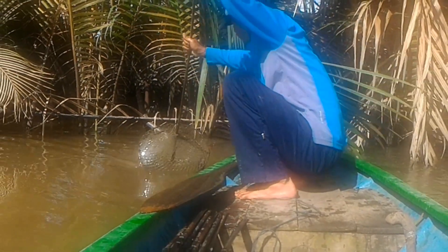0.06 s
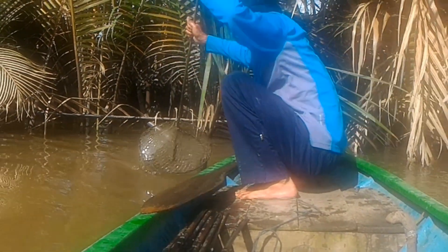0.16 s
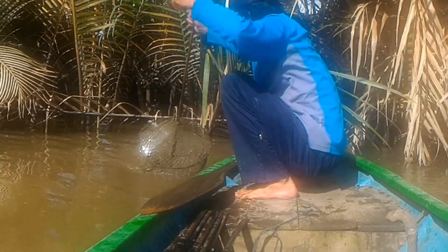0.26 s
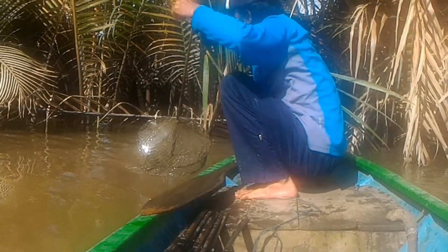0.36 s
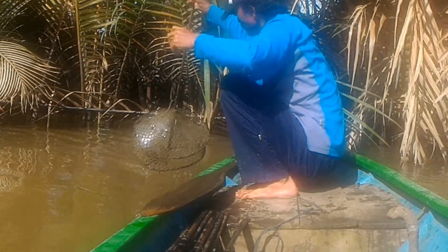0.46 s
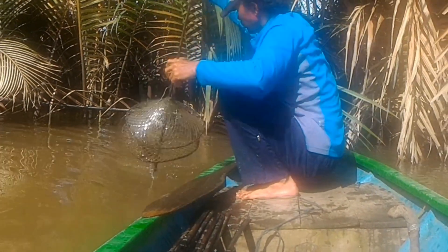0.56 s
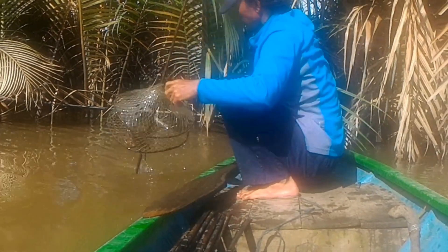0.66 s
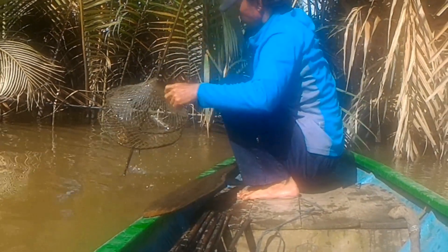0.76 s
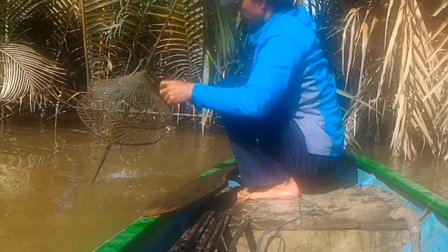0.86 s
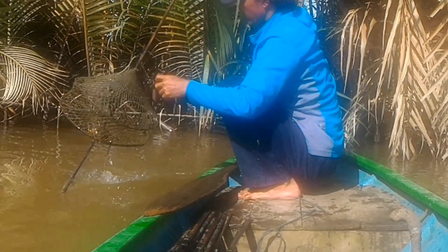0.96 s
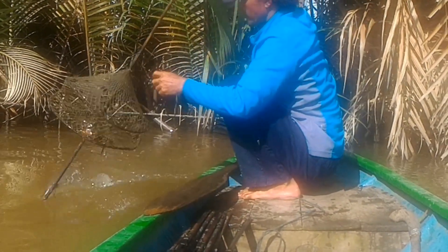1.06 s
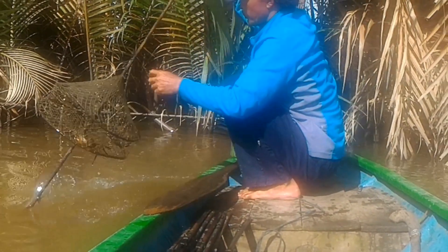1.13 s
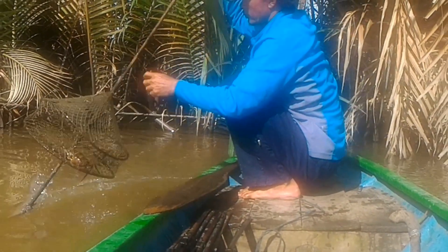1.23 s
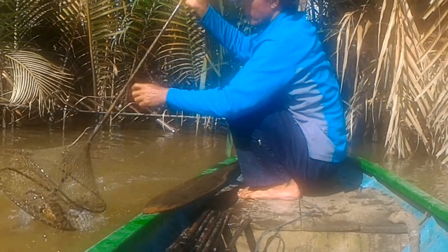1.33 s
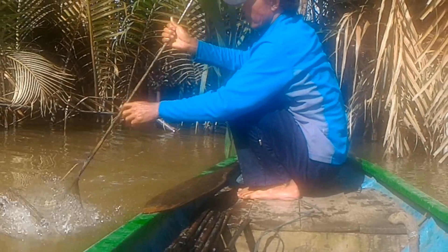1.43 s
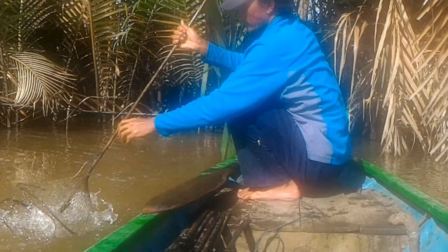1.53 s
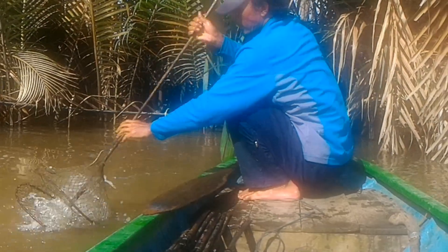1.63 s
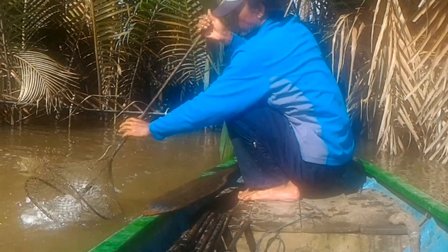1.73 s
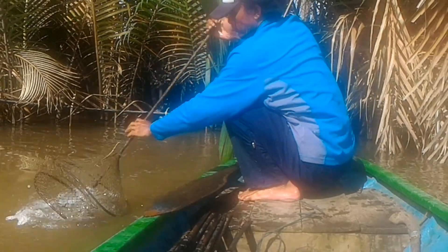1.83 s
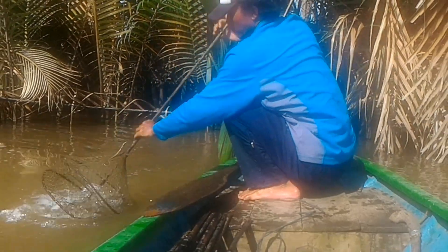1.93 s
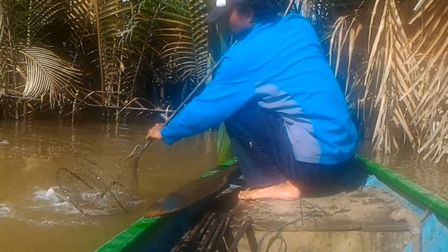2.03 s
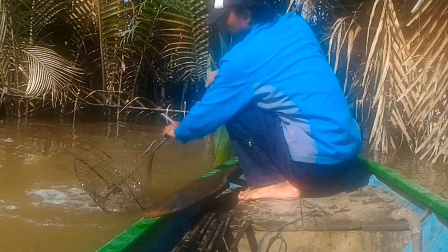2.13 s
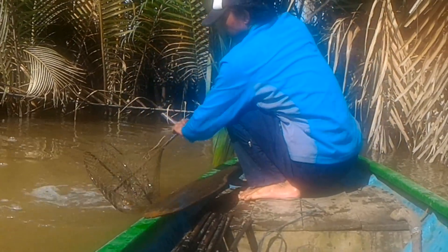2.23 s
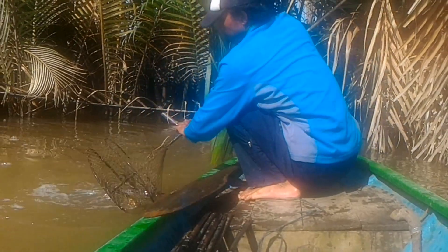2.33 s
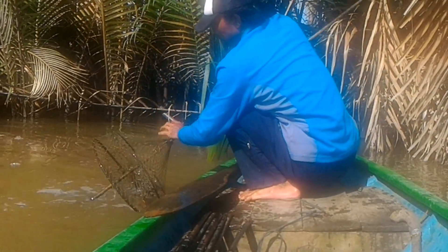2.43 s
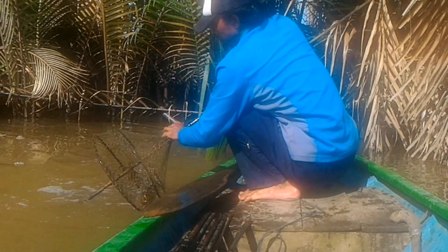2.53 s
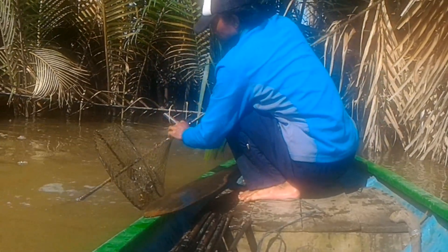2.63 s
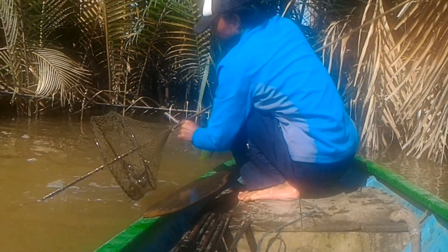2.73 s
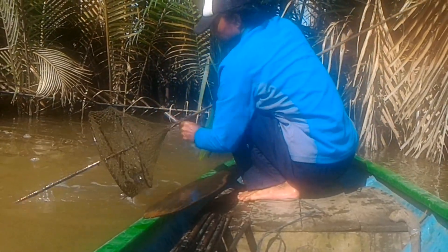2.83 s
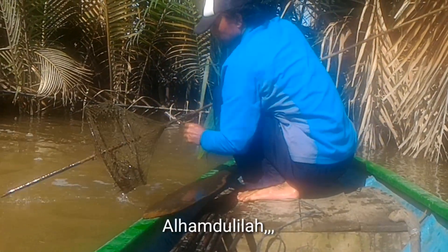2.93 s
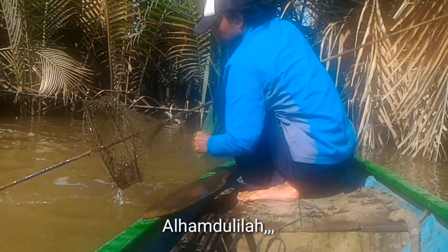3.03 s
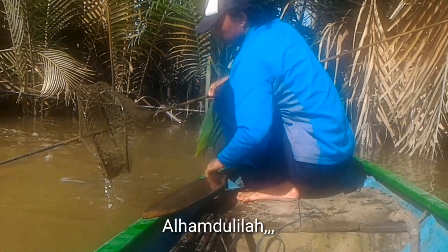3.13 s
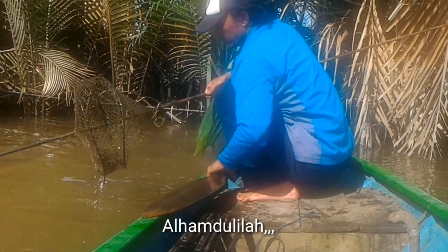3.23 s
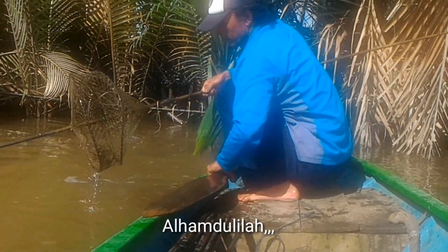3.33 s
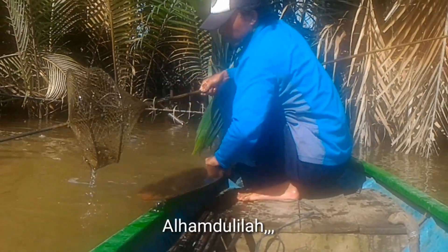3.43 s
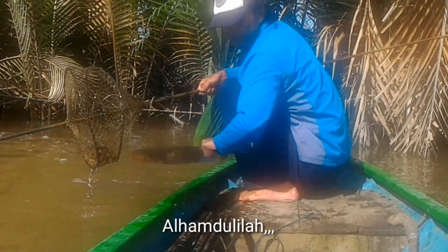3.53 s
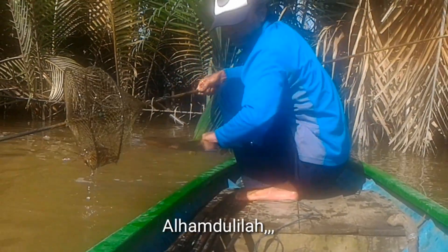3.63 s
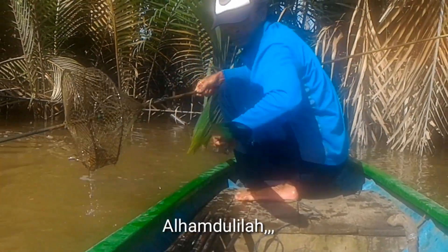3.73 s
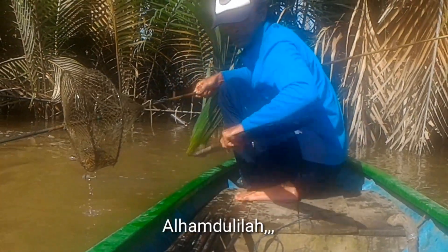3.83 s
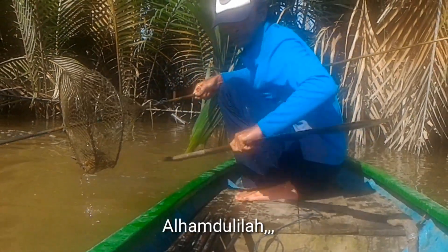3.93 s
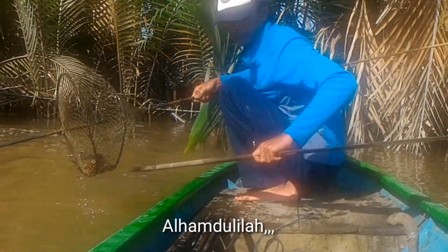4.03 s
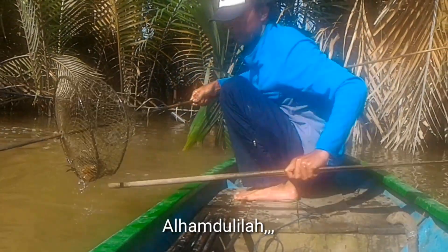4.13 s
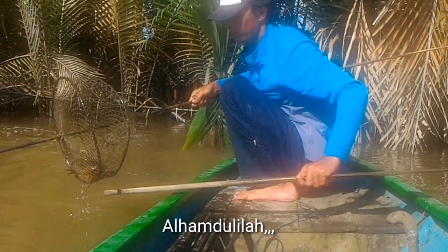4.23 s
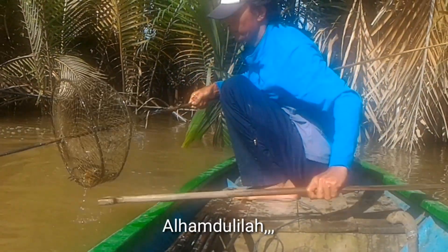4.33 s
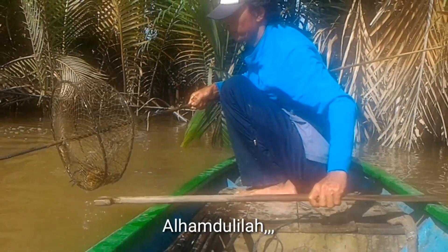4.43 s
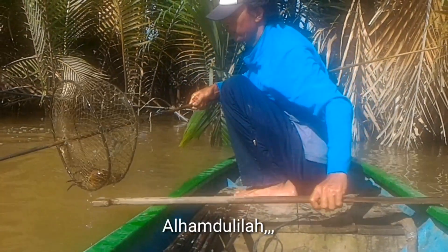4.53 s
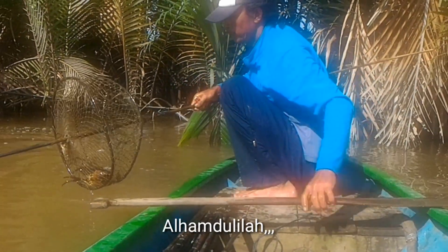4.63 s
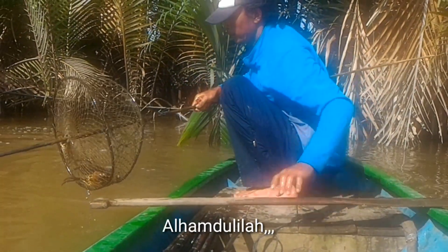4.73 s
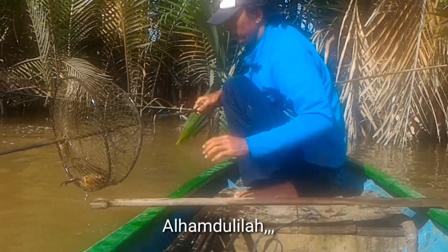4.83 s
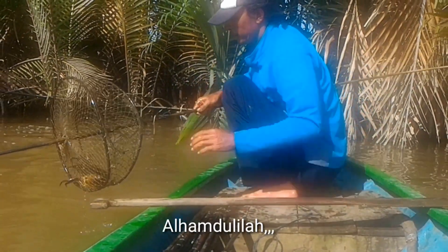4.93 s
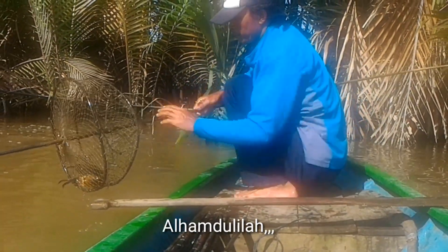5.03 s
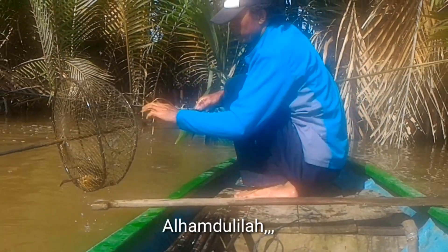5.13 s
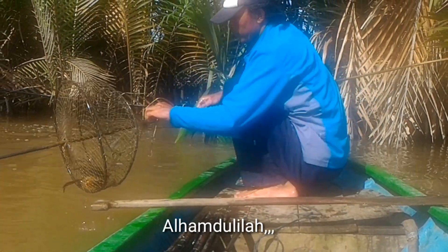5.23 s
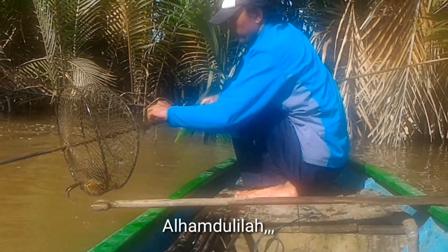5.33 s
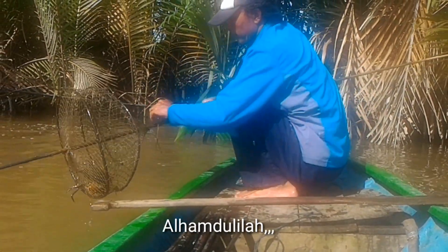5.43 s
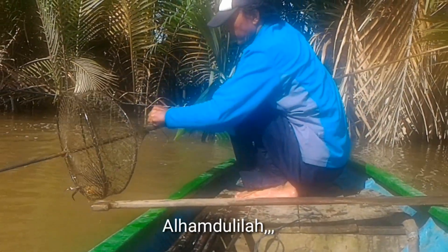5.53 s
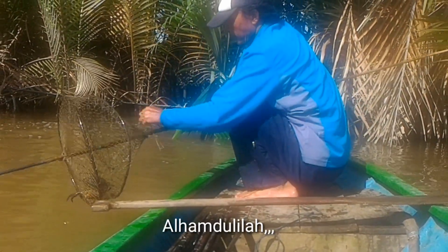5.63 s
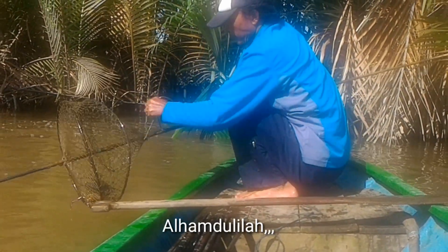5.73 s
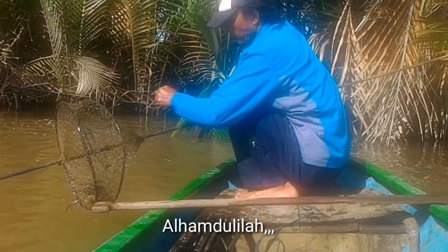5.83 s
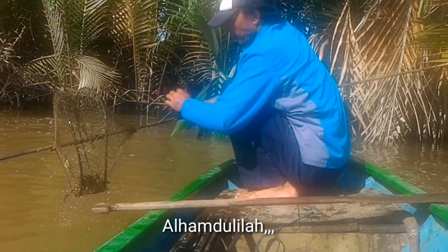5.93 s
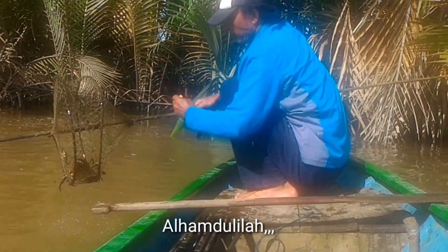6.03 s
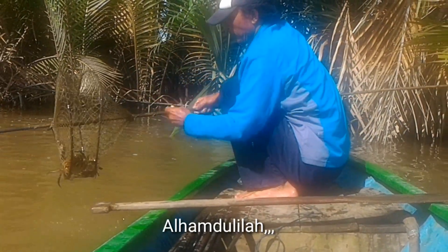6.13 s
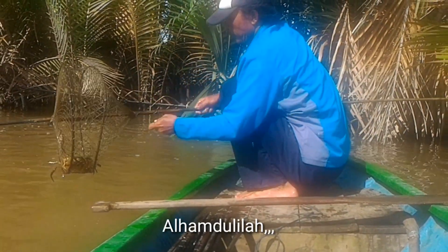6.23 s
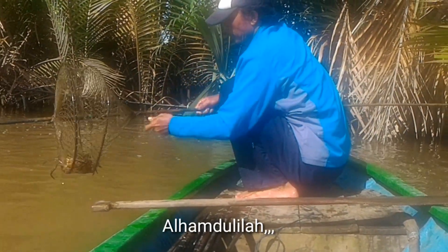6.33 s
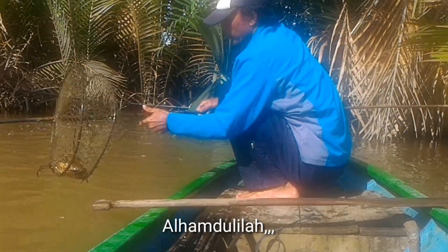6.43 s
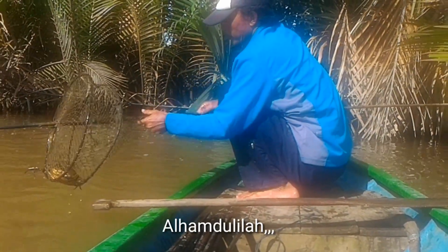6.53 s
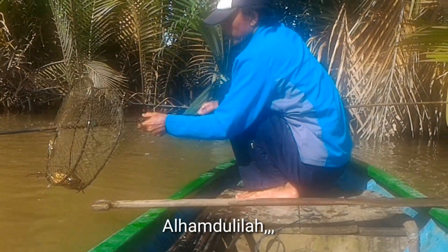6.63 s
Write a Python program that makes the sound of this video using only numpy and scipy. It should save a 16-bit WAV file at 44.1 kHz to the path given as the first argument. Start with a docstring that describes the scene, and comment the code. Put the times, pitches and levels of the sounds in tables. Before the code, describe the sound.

A quick watery splash with gurgling bubbles, trickling drips afterwards, then a pole thuds hollowly onto wooden boat planks while dripping continues.

```python
"""A wire-and-net trap is rinsed in a calm river beside a wooden boat, lifted and left to drip.
The splash is shaped noise and swarms of bubbles; the drips are single bubbles and noise splats.
A pole is laid across the hull with a light knock and a heavy thump: falling chirps and resonances.
The boat rocks and rumbles in low noise and slow swells, under a far rustle of palms made of noise
and a thin bright flickering hiss, likely insects."""
import sys
import numpy as np
from scipy import signal
from scipy.fft import rfft, irfft, next_fast_len
from scipy.io import wavfile

SR = 44100
rng = np.random.default_rng(int(sys.argv[2]) if len(sys.argv) > 2 else 0)


def output_pcm(signal):
    """Save a mono or channel-first signal as 16-bit PCM at the path in sys.argv[1].

    Samples are clipped to [-1, 1] before scaling.
    """
    pcm = np.clip(np.atleast_2d(signal).T, -1, 1) * 32767
    wavfile.write(sys.argv[1], SR, np.round(pcm).astype(np.int16))


N = 294577   # length in samples


def from_db(db):
    """Decibels to gain."""
    return 10 ** (np.asarray(db) / 20)


def rms_one(x):
    """Scale to rms 1."""
    return x / np.sqrt(np.mean(x ** 2) + 1e-20)


def in_time(rows):
    """Columns of a table as curves in time, at -120 dB outside it."""
    s, *columns = np.transpose(rows)
    return [np.interp(np.arange(N) / SR, s, c, left=-120, right=-120) for c in columns]


def add_at(out, s, sound):
    """Mix a short sound in at a moment in seconds, cut where the scene ends."""
    start = round(s * SR)
    out[start:][:len(sound)] += sound[:N - start]


def band_pass(x, low_hz, high_hz):
    """Keep the band between two edges."""
    return signal.sosfilt(signal.butter(2, [low_hz, high_hz], "band", fs=SR, output="sos"), x)


def drift(rate_hz):
    """Slow random wander of rms 1: noise through a double pole, drawn at every 40th sample."""
    r = np.exp(-80 * np.pi * rate_hz / SR)
    noise = rng.standard_normal(N // 40 + 2002)
    slow = signal.lfilter([1], [1, -2 * r, r * r], noise)[2000:]   # the filter has settled by then
    return np.interp(np.arange(N) / 40, np.arange(len(slow)), rms_one(slow))


def coloured(x, spectrum):
    """Give a flat signal a spectrum, drawn straight over log frequency; rms 1."""
    size = next_fast_len(N)
    hz, db = np.transpose(spectrum)
    log_bins = np.log(np.maximum(np.arange(size // 2 + 1) * SR / size, 1))
    gain = from_db(np.interp(log_bins, np.log(hz), db))
    return rms_one(irfft(rfft(x, size) * gain, size)[:N])


def ring(x, hz, t60):
    """Two-pole resonance: a unit click sets a sine of height 1 ringing, 60 dB down after t60 seconds."""
    r, w = from_db(-60 / (t60 * SR)), 2 * np.pi * hz / SR
    return signal.lfilter([0, np.sin(w)], [1, -2 * r * np.cos(w), r * r], x + 1e-18)


def bubbles(s, height, hz, rise, ring_s, size):
    """Short sines that swell in a cycle, hold, then die; the pitch climbs as each bubble nears the surface."""
    t = np.arange(size) / SR
    age = t / ring_s[:, None]
    climb = 2 ** (np.clip(rise, 0, 3)[:, None] * np.minimum(1.03 * age, 1))   # rise is in octaves
    phase = 2 * np.pi * np.cumsum(hz[:, None] * climb, axis=1) / SR
    swell = np.minimum(t * hz[:, None], 1)
    decay = from_db(-60 * age ** 2.9)
    sound = swell * decay * np.sin(phase) * height[:, None]
    at = (s * SR).astype(int)[:, None] + np.arange(size)
    return np.bincount(at.ravel(), sound.ravel(), N + size)[:N]


def swarm(count, until_s, low_hz, high_hz, cycles, spread_db, size):
    """Bubbles at random moments, pitches and sizes, a few much louder; rms 1 while it lasts."""
    when, pitch, rank, rise = rng.random((count, 4)).T
    hz = low_hz * (high_hz / low_hz) ** pitch
    height = from_db(-spread_db * np.log(rank + 0.02)) * np.sqrt(hz)   # long low rings start fainter
    sound = bubbles(when * until_s, height, hz, 0.57 * rise, cycles / hz, size)
    return rms_one(sound) * np.sqrt(until_s * SR / N)


def palms():
    """Far fronds: an even rustle of coloured noise, its level fluttering a little."""
    # Spectrum of the rustle. Each row: frequency in Hz, relative level in dB per Hz.
    rustle_spectrum = [(150, -15), (250, -6), (534, -6.5), (2480, -12.5), (5400, -19), (8460, -17),
                       (9710, -19.5), (11700, -23.5), (14200, -24.5), (15500, -22)]
    rustle_db = -64.5
    flutter_db = 0.8 * drift(4) + 1.2 * drift(15) + 1.3 * drift(40)
    return from_db(rustle_db + flutter_db) * coloured(rng.standard_normal(N), rustle_spectrum)


def insects():
    """A thin bright flickering hiss, likely insects: a band of noise with a wandering level."""
    hiss_db = -87.0
    hiss = rms_one(band_pass(rng.standard_normal(N), 5500, 10500))
    return from_db(hiss_db + 2.0 * drift(11.0)) * hiss


def boat():
    """Lumpy low rumble with a few dull lurches, each a swell of two or three slow cycles."""
    # Rumble as the boat rocks. Each row: time in seconds, level in dB.
    rocking = [(0, -51.5), (1.4, -52.5), (1.8, -52), (2.8, -54), (3.2, -52), (4.05, -54), (4.2, -51.5),
               (4.55, -40.5), (4.75, -55), (6.4, -51.5), (6.68, -51.5)]
    # Spectrum of the rumble. Each row: frequency in Hz, relative level in dB per Hz.
    rumble_spectrum = [(8.8, -41), (15, 3), (32, -4.5), (93, -5.5), (112, -7.5), (134, -17.5), (193, -13.5),
                       (247, -22), (270, -25), (500, -38), (650, -96), (1100, -120)]
    # Lurches of the hull. Each row: start in seconds, level in dB, frequency in Hz.
    lurches = [(0.099, -34, 43.8), (0.149, -41, 36.8), (0.949, -46.5, 29), (1.227, -45, 37.3),
               (2.066, -43, 40.3), (2.127, -46.5, 28.3), (2.423, -50, 47.7), (3.872, -44, 48.7),
               (4.147, -37, 33), (4.228, -46, 58.3), (4.502, -33, 58.4), (4.992, -53, 65.5),
               (6.43, -47.5, 32.5)]
    rumble_db, = in_time(rocking)
    lumps_db = 1.5 * drift(10)
    out = from_db(rumble_db + lumps_db) * coloured(rng.standard_normal(N), rumble_spectrum)
    t = np.arange(9000) / SR
    for s, db, hz in lurches:
        swell = t * hz / 0.36 * np.exp(1 - t * hz / 0.66)
        add_at(out, s, from_db(db) * swell * np.sin(2 * np.pi * hz * t))
    return out


def pole_chirp():
    """Bending waves run faster at high pitch, so a blow reaches us along the pole as a falling chirp."""
    travel_s = 0.005   # along the pole at 1000 Hz
    hz = np.arange(1001) * SR / 2000
    # phase lag in turns, its delay counted from the arrival of 3000 Hz
    lag_turns = travel_s * (2 * np.sqrt(1000 * hz) - hz * np.sqrt(1 / 3))
    in_band = (hz > 200) * (hz < 3000)
    return 10 * irfft(np.exp(-2j * np.pi * lag_turns) * in_band, 2000)


def planks(s, thud_db, reach_db):
    """The planks take up the push slowly and boom late: each mode is driven through its own twin."""
    # Modes of the hull. Each row: frequency in Hz, relative level in dB, decay by 60 dB in seconds.
    hull_modes = [(63.3, -17, 0.086), (141, -2, 0.07), (199, -5.5, 0.075), (292.4, -1.5, 0.068),
                  (345, -1, 0.027)]
    out = np.zeros(N)
    for hz, db, t60 in hull_modes:
        push = np.zeros(N)
        push[np.round(s * SR).astype(int)] = from_db(thud_db + db + reach_db * np.log2(283 / hz))
        top = t60 * SR / np.log(1000) / (2 * np.e)   # height reached by a resonance driven through itself
        out += ring(ring(push, hz, t60), hz, t60) / top
    return out


def knocks():
    """Pole on hull: a chirped clack with a brief rattle rings the pole, with a bright edge and a thud."""
    # Touches of the pole. Each row: start in seconds, clack in dB, thud in the planks in dB,
    # reach into the deep modes in dB per octave, lowest tone of the clack in Hz, bright edge in dB.
    touches = [(4.2717, -31, -49.5, 10, 1250, -39), (4.279, -40, -34, 1.5, 490, -41),
               (4.307, -40, -51, -18, 1510, -52), (4.315, -45, -60, -8, 1500, -52),
               (4.4277, -18.5, -27.5, -8.5, 700, -43.5), (4.447, -19.5, -27.5, 10, 1090, -42),
               (4.474, -49, -36.5, -18, 1720, -45), (4.587, -77, -42.5, -3, 1700, -70)]
    # Modes of the pole. Each row: frequency in Hz, relative level in dB.
    pole_modes = [(575, 0), (700, -1), (848, -1), (1048, -2.5), (1490, -19), (1680, -7.5), (2110, -10.5),
                  (2400, -6), (3600, -4.5)]
    rattle_db, pole_db = -19, -25.5            # against the clack
    pole_ring_cycles, hardness_hz = 19.4, 2680   # ring down by 60 dB; usual upper edge of the clack
    edge_ms = 13.5                             # decay to 1/e, as for the rattle below
    contact, edge, t = np.zeros(N), np.zeros(N), np.arange(2000) / SR
    chirp = pole_chirp()
    for s, db, _, _, low_hz, edge_db in touches:
        rattle_ms = 4.9 + 0.35 * (-19.5 - db)   # softer touches rattle longer
        grains = rng.standard_normal(len(t)) * np.exp(-1000 * t / rattle_ms)
        rattle = np.convolve(grains, chirp[:800])[:len(t)]
        blow = chirp + from_db(rattle_db) * rattle
        clack = band_pass(blow, low_hz, max(hardness_hz, 1.3 * low_hz))
        add_at(contact, s, from_db(db) * clack)
        fizz = rng.standard_normal(len(t)) * np.exp(-1000 * t / edge_ms)
        add_at(edge, s, from_db(edge_db) * fizz)
    pole = sum(from_db(db) * ring(contact, hz, pole_ring_cycles / hz) for hz, db in pole_modes)
    s, _, thud_db, reach_db, *_ = np.transpose(touches)
    return contact + from_db(pole_db) * pole + band_pass(edge, 2800, 6000) + planks(s, thud_db, reach_db)


def trickle():
    """The trap drains afterwards: a thin swarm of small random bubbles."""
    # Draining. Each row: time in seconds, level in dB.
    draining = [(1.8, -78), (2.2, -66), (2.9, -69), (3.4, -72.5), (4.0, -70.5), (5.5, -74.5), (6.68, -80)]
    trickle_db, = in_time(draining)
    return from_db(trickle_db) * swarm(
        count=5000, until_s=N / SR, low_hz=1200, high_hz=4200, cycles=22, spread_db=2.4, size=700)


def whoop():
    """One drip sweeps far up: its pitch climbs steadily while it swells and dies."""
    # The sweeping drip, one row: start in seconds, level in dB, starting pitch in Hz,
    # climb in Hz per ms, length in ms.
    sweep = (3.6665, -39, 1350, 390, 8.0)
    s, db, hz, hz_per_ms, length_ms = sweep
    ms = np.clip(1000 * (np.arange(N) / SR - s), 0, length_ms)
    shape = np.sqrt(np.sin(np.pi * ms / length_ms).clip(0))
    turns = (hz * ms + hz_per_ms * ms ** 2 / 2) / 1000
    return from_db(db) * shape * np.sin(2 * np.pi * turns)


def plinks():
    """Single bubbles, from small plinks to deep gulps; higher ones ring shorter."""
    # Bubbles. Each row: start in seconds, level in dB, starting pitch in Hz.
    single_bubbles = [(.46, -50, 2020), (.52, -56, 720), (.661, -56, 800), (0.689, -52, 890),
                      (.862, -46, 2630), (.92, -52, 1030), (1.034, -51, 420), (1.074, -33, 1490),
                      (1.077, -40, 2510), (1.16, -48.5, 744), (1.182, -47, 810), (1.182, -46, 2960),
                      (1.247, -44, 1210), (1.317, -28, 2110), (1.317, -38, 1230), (1.356, -32, 161.6),
                      (1.38, -38, 274), (1.382, -33.5, 710), (1.393, -34.5, 199), (1.398, -39, 600),
                      (1.477, -34.5, 164.5), (1.48, -37.5, 600), (1.497, -43.5, 200), (1.521, -41, 934),
                      (1.57, -44, 2900), (1.577, -44, 1380), (1.646, -46, 1400), (1.924, -56.5, 1210),
                      (2.543, -52.5, 2850), (3.062, -54, 338), (3.101, -49, 1880), (3.123, -47.5, 229),
                      (3.206, -56.5, 1400), (3.265, -56, 1160), (3.377, -52, 3080), (3.5, -59, 635),
                      (3.775, -52, 2580), (3.8725, -49, 767), (4.8584, -54, 830), (5.2643, -54.5, 2100),
                      (6.2492, -56.5, 2000)]
    s, db, hz = np.transpose(single_bubbles)
    ring_ms = 15.4 * (hz / 1000) ** -0.7   # down by 60 dB
    rise_octaves = np.full(len(s), 0.24)
    return bubbles(s, from_db(db), hz, rise_octaves, ring_ms / 1000, size=6500)


def splats():
    """Splats of drops and ticks of wet mesh: a slap and a dying band of noise, broader ones longer."""
    # Splats and ticks. Each row: start in seconds, level in dB, centre in Hz, width in octaves.
    splat_rows = [(0.033, -34, 6400, 0.26), (0.702, -39.5, 2610, 1.3), (0.754, -36, 7000, 0.26),
                  (0.946, -40, 4700, 1.33), (1.023, -38, 2250, .7), (1.102, -39, 2590, 2.1),
                  (1.126, -39, 2590, 1), (1.139, -31, 2570, 0.57), (1.197, -35.5, 6150, 0.71),
                  (1.995, -48, 7540, 0.47), (2.11, -37, 7000, 0.49), (2.204, -39, 2950, 0.9),
                  (2.411, -48, 3920, 1.5), (2.766, -38.5, 6560, 0.44), (2.933, -42, 5400, 0.34),
                  (2.952, -45, 4350, 0.4), (3.096, -32.5, 2130, 0.88), (3.103, -39.5, 2300, 1.46),
                  (3.312, -47, 5400, 0.75), (3.3578, -46.5, 2840, 1.4), (3.383, -48.5, 3280, 1.3),
                  (3.418, -49, 7000, 0.69), (3.566, -48, 3600, 0.75), (3.6417, -38.5, 7100, 0.42),
                  (3.6705, -33, 2500, 0.67), (3.70, -48, 2600, .6), (3.87, -49, 1690, 2.4),
                  (4.104, -45, 3160, 0.28), (4.684, -45, 6400, 0.49), (4.858, -49, 1600, 2),
                  (4.996, -65, 3480, 1.2), (5.116, -48, 4600, .75), (5.306, -42.5, 6130, 0.55),
                  (5.611, -50.5, 3480, 2.3), (5.7543, -43, 4960, 2.4), (5.925, -53, 6500, 1.2),
                  (5.9332, -41.5, 5700, 1.7), (5.953, -43.5, 4440, 2.3), (6.0042, -42.5, 5750, 2.4),
                  (6.249, -52, 2700, 0.97), (6.559, -42, 2450, 0.67)]
    # 70 faint ones at random moments
    stray = [(when * N / SR, -59 - 1.5 * np.log(rank + 0.026), 2300 * 3 ** pitch, 0.56 + wide)
             for when, rank, pitch, wide in rng.random((70, 4))]
    out, t = np.zeros(N), np.arange(2600) / SR
    for s, db, hz, octaves in list(splat_rows) + stray:
        t60_ms = 12.2 + 20.2 * octaves
        burst = rng.standard_normal(len(t)) * from_db(db - 60000 * t / t60_ms)
        burst[0] = 3 * from_db(db)   # the slap of first contact
        edges_hz = hz * 2 ** (np.clip(octaves, 0.3, 3) * np.array([-0.5, 0.5]))
        low_hz, high_hz = np.minimum(edges_hz, 9500)
        add_at(out, s, band_pass(burst, low_hz, high_hz))
    return out


def drips():
    """All that falls from the trap: trickle, sweeping drip, single bubbles and splats."""
    return trickle() + whoop() + plinks() + splats()


def sloshes():
    """Gains of spray and froth: each slosh rises fast, holds and falls away, over the streaming."""
    # Water streaming off the trap while it is rinsed. Each row: time in seconds, level in dB.
    streaming = [(0, -59), (.67, -62), (1.05, -57.5), (1.55, -53.5), (1.7, -57), (1.86, -68), (2.3, -70)]
    # The trap dipped and swung. Each row: start of the hold in seconds, time held in seconds,
    # spray in dB, froth in dB, rise in dB per second.
    slosh_rows = [(0.271, 0.06, -50, -59, 327), (0.383, 0.011, -46.5, -69, 346),
                  (.83, 0.011, -53.5, -72, 346), (1.12, 0.11, -53.5, -81, 344),
                  (1.284, 0.0091, -40, -69, 504), (1.304, 0.018, -35.5, -63, 4000),
                  (1.333, 0.011, -46, -48, 800), (1.36, 0.069, -43, -40, 346),
                  (1.482, 0.021, -46, -50.5, 900), (1.745, 0.03, -51, -66, 346),
                  (2.2, 0.0082, -64, -72, 346)]
    stream_froth_db, fall_db_per_s = -6.5, 324   # froth against spray in the streaming
    t = np.arange(N) / SR
    stream_db, = in_time(streaming)
    spray_power = from_db(stream_db) ** 2
    froth_power = from_db(stream_db + stream_froth_db) ** 2
    for s, held_s, spray_db, froth_db, rise_db_per_s in slosh_rows:
        before_db = rise_db_per_s * np.maximum(s - t, 0)
        after_db = fall_db_per_s * np.maximum(t - s - held_s, 0)
        power = from_db(-before_db - after_db) ** 2
        spray_power = spray_power + from_db(spray_db) ** 2 * power
        froth_power = froth_power + from_db(froth_db) ** 2 * power
    return np.sqrt(spray_power), np.sqrt(froth_power)


def splash():
    """Spray is a dense patter of droplets, its dull and bright halves clumping apart, with pops; froth rings."""
    # Spectrum of the droplets. Each row: frequency in Hz, relative level in dB per Hz.
    spray_spectrum = [(530, -6), (900, -18.5), (1170, -19), (1590, 0.5), (2120, 1.5), (2600, 4), (4030, 1),
                      (7760, -1.5), (15500, -25)]
    pops_db = -5.5   # sharp pops against the patter
    spray_gain, froth_gain = sloshes()
    patter = 0
    for half in ("low", "high"):
        clumps_db = 2.5 * drift(200) + 2.6 * drift(40)
        droplets = coloured(rng.standard_normal(N) * from_db(clumps_db), spray_spectrum)
        patter = patter + signal.sosfilt(signal.butter(2, 3000, half, fs=SR, output="sos"), droplets)
    pops = swarm(count=3600, until_s=2.3, low_hz=700, high_hz=5500, cycles=20.0, spread_db=4.8, size=600)
    froth = swarm(count=2600, until_s=2.3, low_hz=208.7, high_hz=2305, cycles=8.0, spread_db=3.0, size=1200)
    return spray_gain * (patter + from_db(pops_db) * pops) + froth_gain * froth


def banks(x):
    """A short dull tail of decaying noise, scattered back by the palms and the water."""
    t = np.arange(9000) / SR
    dull = signal.lfilter(*signal.butter(1, 2500, fs=SR), rng.standard_normal(len(t)))
    tail = dull * from_db(-60 * t / 0.29)
    tail[:200] = 0   # nothing comes back in the first 4.5 ms
    return signal.fftconvolve(x, tail / np.sqrt(np.sum(tail ** 2)))[:N]


def scene():
    """Water and wood with their echoes, over boat rumble, far rustle and insect hiss."""
    water, wood = splash() + drips(), knocks()
    echoes = banks(from_db(-16.0) * water + from_db(-16.5) * wood)
    return (water + wood + echoes + boat() + palms() + insects())[None]


def record(dry):
    """The small microphone dulls above ten kilohertz; the top is cut steeply."""
    dulled = signal.sosfilt(signal.butter(2, 10500, fs=SR, output="sos"), dry)
    return signal.sosfilt(signal.cheby2(14, 60, 15650, fs=SR, output="sos"), dulled)


dry = scene()
out = record(dry)
output_pcm(out)
```